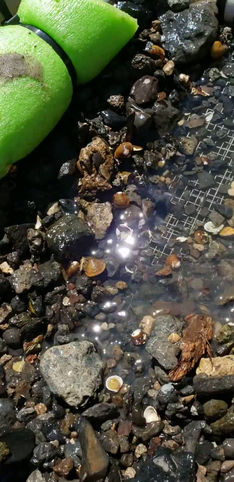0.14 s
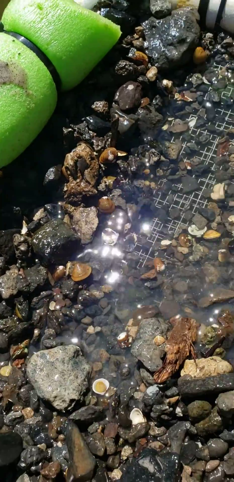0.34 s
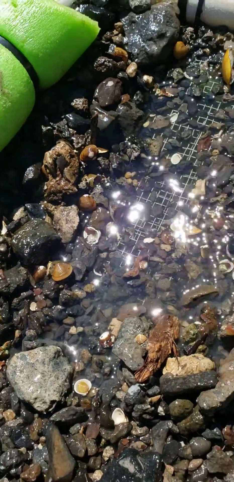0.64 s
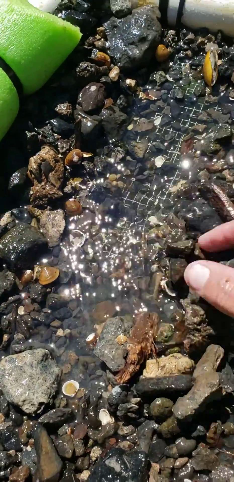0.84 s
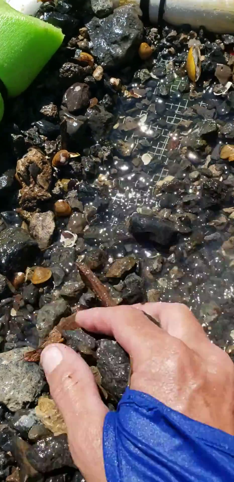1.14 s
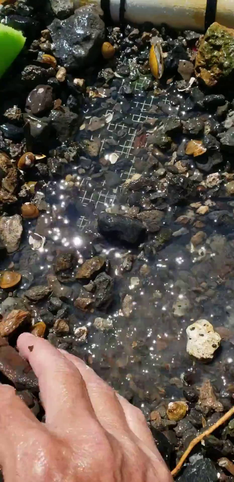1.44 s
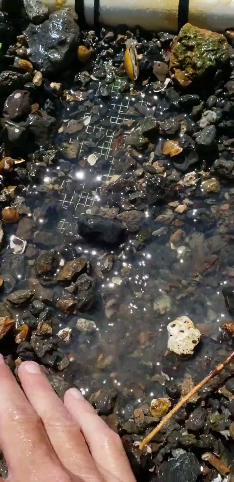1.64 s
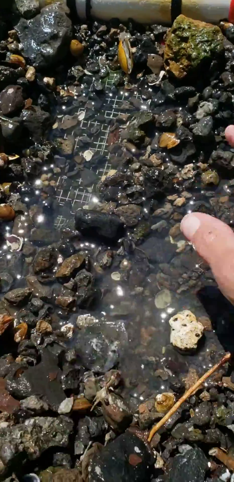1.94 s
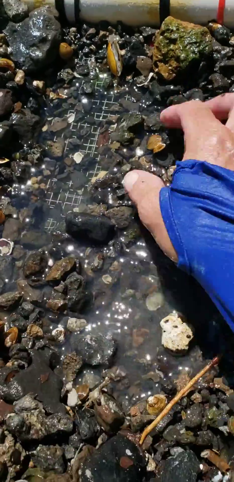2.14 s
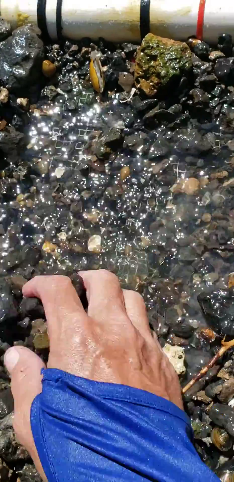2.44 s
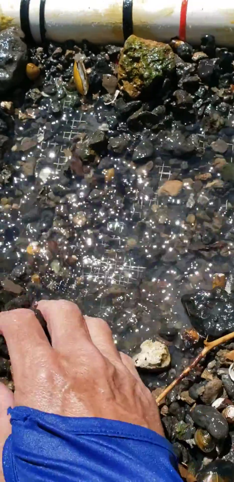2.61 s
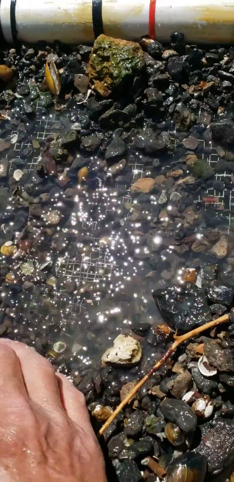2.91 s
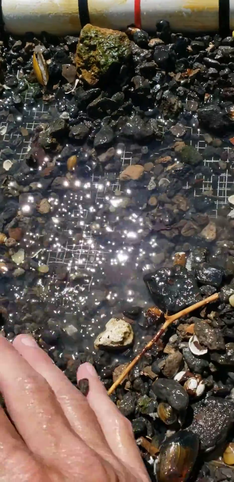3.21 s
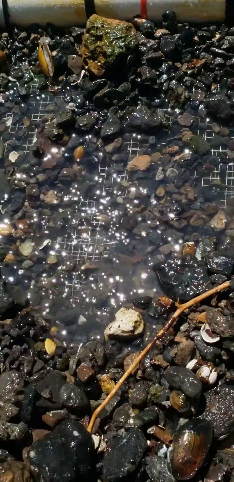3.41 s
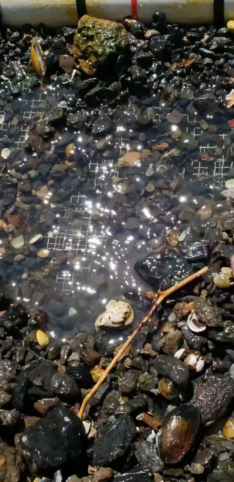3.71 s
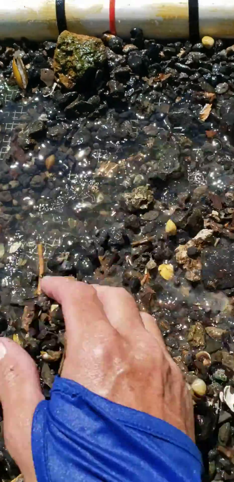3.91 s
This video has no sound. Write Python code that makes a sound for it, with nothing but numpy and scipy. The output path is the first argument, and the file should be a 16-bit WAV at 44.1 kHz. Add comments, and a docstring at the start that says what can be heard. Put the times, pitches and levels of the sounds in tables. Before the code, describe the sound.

Close up outdoors, wet gravel and shells lie on a floating sifter screen. Several crisp stone clicks and tiny slips open the scene, thinning to near quiet by 0.2 s. A soft frame bump comes near 0.35 s, with a faint rising slurp around 0.5 s, as a hand's rake builds into a dense, bright crunch with grating pebbles, strongest around 0.8-1.0 s. It fades gradually through 1.6 s with stray clicks. Light ticks and slips gather from 1.8 s; a short, sharp rake hits at about 2.2 s with a watery gurgle, then decays through pebble slides and small bubbles near 2.7-2.95 s. From 3.0 to 3.5 s there is only light grit and small snaps. A forceful crunch with a low frame thump swells at 3.6-3.9 s, and another follows abruptly at 3.9 s, with gurgles to the end. Stones sit mostly left of centre over a very faint low drone.

```python
"""A few wet stones click and slip, then a hand rakes gravel and shell across a floating sifter screen.
Grit, pebbles and single stones are short damped rings; noise reflections scatter them over the bed.
Water is many tiny rising bubbles and larger gurgles; a short rising slurp and a faint, nearly level tone
are unsteady sines. Low rings make the frame rumble and the mesh scrape; stones slide and settle between
strokes. Filtered noise and a wavering hum make a faint low outdoor drone."""
import sys
import numpy as np
from scipy import signal
from scipy.fft import rfft, irfft, next_fast_len
from scipy.io import wavfile
from scipy.ndimage import uniform_filter1d, map_coordinates

SR = 44100
rng = np.random.default_rng(int(sys.argv[2]) if len(sys.argv) > 2 else 0)


def wrap_up_sound(samples):
    """Save the sound to the file named by the first command line argument, as 16-bit audio."""
    columns = np.atleast_2d(samples).T
    # keep every value between -1 and 1, then stretch to whole-number steps
    tamed = np.clip(columns, -1, 1)
    steps = np.round(tamed * 32767).astype(np.int16)
    wavfile.write(sys.argv[1], SR, steps)


N = 179221  # samples in the scene

# path of the moving stones: start_s [s], left_over_right_db [dB]
STONE_PATH = [(0.0, -0.5), (0.04, 3.5), (0.65, 3.5), (1.02, 0.5), (1.94, 2), (2.09, 6), (2.11, 7),
              (2.16, 6), (2.41, 2.0), (3.63, 4.5), (4.04, 1.5), (4.06, 5.5)]
# stones and shells that snap together: start_s [s], level_db [dB, first 2 ms before reflections],
# ring_hz [Hz, centre of the modes], left_over_right_db [dB]
STONE_CLICKS = [(.0103, -27.5, 14350, 0), (.0381, -30, 14060, 6), (.0433, -24, 10600, 4),
                (.2214, -47.5, 4040, 7), (.2968, -42, 6130, 5), (.3339, -35, 4570, 5),
                (.5737, -19, 13900, 8), (.6156, -28.5, 4296, 10.5), (.6775, -22, 12800, 8),
                (.6862, -32, 6880, 9.5), (.8492, -18, 3880, 3), (1.2301, -26.5, 13240, -7),
                (1.3217, -31.5, 10100, 0), (1.4452, -29, 11200, 3), (1.8374, -31, 12250, 0.5),
                (1.8422, -27, 5500, 5), (1.8485, -30, 13100, 3), (1.9229, -32, 9620, -2),
                (1.9737, -39, 4990, 8), (1.9996, -36.5, 14550, 4.5), (2.0171, -32, 13130, 2),
                (2.0331, -32, 13500, 7), (2.0407, -27.5, 11420, 1.5), (2.1174, -28, 10600, -6.5),
                (2.1963, -19, 15270, 11), (2.2293, -32, 14300, 7), (2.3088, -27.5, 3500, 6),
                (2.4832, -25, 10630, 2.5), (3.0637, -32.5, 12960, 1), (3.1408, -32.5, 6390, 6),
                (3.205, -27, 12180, 7), (3.2822, -29.5, 14530, 4), (3.345, -32, 14720, 5),
                (3.3972, -33, 14180, 3.5), (3.421, -33, 13200, 9), (3.4288, -30, 10640, 5),
                (3.5429, -40.5, 13340, 3), (3.6029, -30.5, 10350, 2), (3.6622, -23, 12150, 15),
                (3.8376, -26, 14800, 5)]
# air pockets that gurgle through the mesh: start_s [s], level_db [dB, before a common trim],
# pitch_hz [Hz, centre of the bubbles]
AIR_POCKETS = [(2.224, -18.5, 1462), (2.709, -24, 2218), (2.78, -28, 1330), (2.794, -31, 1138),
               (2.946, -34, 1330), (2.96, -35.5, 1170), (3.777, -23, 2476), (3.849, -25, 929),
               (3.983, -19.5, 1638), (4.013, -23, 1480)]
# tone colours of gravel, water, mesh, frame and outdoor air: freq_hz [Hz], response_db [dB]
GRAVEL_COLOUR = [(900, -42), (1500, -25.5), (2100, -11.5), (2700, -6.5), (3500, -2.5), (4700, 0),
                 (6500, -0.5), (7700, -2), (8500, -5), (10000, 0), (13000, 2), (16000, -1)]
WATER_COLOUR = [(400, -56), (800, -8.5), (1300, 3), (2200, -2.5), (3200, -4), (6000, -41)]
MESH_COLOUR = [(150, -13.5), (330, 1), (600, 1), (900, 0), (1600, -13)]
FRAME_COLOUR = [(70, -44), (140, -4), (200, 6.5), (300, -2.5), (600, -45)]
OUTDOOR_COLOUR = [(20, -31), (35, -6.5), (60, 3), (95, 3.5), (130, -6), (200, -4), (300, -24), (500, -18),
                  (800, -55), (1600, -18), (3000, -29.5)]
# decay of the reflections off the gravel bed, for stones and water: freq_hz [Hz], t60_s [s]
BED_DECAY = [(500, 0.093), (4000, 0.076), (14000, 0.034)]
# rakes of the hand: start_s [s], rise_s [s], hold_s [s], fade_db_per_s [dB/s, before SETTLING_SPEED],
# lift_s [s], grit_db [dB], pebbles_db [dB], large_stones_db [dB], water_db [dB, before a common trim]
RAKE_STROKES = [(.365, .52, .07, 30, 1.67, -25, -27, -24, -38),
                (1.72, .12, .1, 30.5, 2.04, -47.5, -49, -48, -68),
                (2.085, .115, .03, 85, 2.42, -31, -34, -38.5, -36),
                (2.27, .17, .06, 18, 2.96, -38, -38, -37, -53),
                (3.01, .06, .15, 45, 3.43, -43.5, -47.5, -53, -69),
                (3.575, .21, .1, 120, 3.9, -22.5, -27.5, -24.5, -41.5),
                (3.89, .04, .06, 110, 4.1, -24, -28.5, -29, -42)]
# small avalanches of loose stones: start_s [s], length_s [s], grit_db [dB], pebbles_db [dB]
STONE_SLIDES = [(.002, .012, -39, -41), (0.033, .05, -42, -45), (.1, .045, -50, -48), (.17, .015, -52, -51),
                (.275, .04, -56, -54), (.335, .035, -44, -46), (.41, .14, -45, -39),
                (0.767, .035, -31, -27.5), (.835, .025, -32, -28), (0.914, .025, -28, -32),
                (1.41, .03, -41.5, -46), (1.621, .045, -43.5, -51), (1.81, .055, -44, -46),
                (1.92, .03, -40.5, -51.5), (2.176, .044, -25, -32), (2.28, .04, -36, -40),
                (2.47, .02, -33, -39), (2.693, .03, -42, -43), (2.765, .033, -38, -40),
                (2.888, .025, -36, -40), (2.94, .03, -42, -46), (3.125, .03, -43, -44),
                (3.178, .025, -41, -45), (3.245, .025, -41, -49)]
# resting bed: grit_db, pebbles_db, large_stones_db, water_db [dB, water before a common trim]
BED_REST_DB = [-59, -63, -58, -69]
# the hand's weight on the screen: start_s [s], rise_s [s], hold_s [s], fade_db_per_s [dB/s], lift_s [s],
# frame_db [dB, before a small trim], mesh_db [dB]
HAND_PRESSES = [(0, 0.035, .12, 102.5, 0.56, -63, -59), (.31, 0.047, 0.0096, 120, .5, -53.5, -48.5),
                (.38, 0.13, 0.43, 25.5, 1.65, -61, -49.5), (1, 0.31, 0.2, 81.5, 2.1, -59, -65),
                (1.53, 0.033, .02, 90, 1.72, -56, -56), (1.81, 0.026, 0.013, 206, 1.97, -59, -67),
                (1.98, 0.025, 0.009, 201.5, 2.25, -59.5, -66.5), (2.085, .08, 0.071, 66, 2.45, -56, -43.5),
                (2.83, 0.044, 0.043, 92.5, 3.17, -62.5, -67), (3.25, .15, 0.26, 50, 3.7, -71.5, -67.5),
                (3.59, 0.064, 0.064, 150, 3.84, -46.5, -51), (3.58, 0.14, 0.2, 74.5, 4.03, -58, -51)]
# floating screen at rest: frame_db [dB, before a small trim], mesh_db [dB]
FLOAT_REST_DB = [-68, -74]
# a short rising slurp and a faint, nearly level tone: start_s [s], length_s [s], first_hz [Hz],
# last_hz [Hz], level_db [dB, before the swell], unsteadiness_hz [Hz]
FAINT_TONES = [(.47, 0.14, 1080, 2127, -51, 69.5), (3.269, 0.414, 575.6, 584, -68.5, 45)]
# fade speed, heavy stones stopping first: grit, pebbles, large_stones, water [factor]
SETTLING_SPEED = [.95, 1.1, 1.26, 1]

TOP_HZ = 16000  # band limit
STONE_T60_S = .011
PUSH_CURVE = 1.25  # exponent of the build-up
LIFT_DB_PER_S = 220.5  # extra fade once the hand lifts
SLIDE_LARGE_DB, SLIDE_WATER_DB = 2.5, -13  # larger stones and water against a slide's pebbles
SLIDE_RISE_SHARE = .5  # part of its length that a slide takes to gather
SLIDE_FADE_DB_PER_S = 470  # before SETTLING_SPEED
PRESS_WATER_DB = -4  # water forced through the screen, against the mesh scrape


def amp(db):
    """Decibels to gain."""
    return 10 ** (np.asarray(db) / 20)


def unit(x):
    """x at rms 1."""
    return x / np.sqrt(np.mean(x ** 2) + 1e-20)


def along(points, hz):
    """Read (Hz, value) points on a log frequency axis."""
    f, v = np.transpose(points)
    return np.interp(np.log(hz + 1), np.log(f + 1), v)


def curves(rows):
    """Draw one curve over the scene for each column after the time."""
    s, *columns = np.transpose(rows)
    return [np.interp(np.arange(N) / SR, s, column) for column in columns]


def filtered(x, response):
    """Apply a gain that depends on frequency, padded so the end does not wrap to the start."""
    m = next_fast_len(N + SR // 4)
    gain = response(np.fft.rfftfreq(m, 1 / SR))
    return irfft(rfft(x, m) * gain, m)[..., :N]


def coloured(x, spectrum):
    """Tint x with a (Hz, dB) response."""
    return filtered(x, lambda hz: amp(along(spectrum, hz)))


def wobble(rate):
    """A smooth random curve with rate knots a second."""
    knots = rng.standard_normal(int(N * rate / SR) + 4)
    return map_coordinates(knots, [np.arange(N) * rate / SR])


def panned(lr_db):
    """Left and right gains of constant power, lr_db apart."""
    g = amp(np.array([lr_db, -lr_db]).reshape(2, -1) / 2)
    return g / np.sqrt(np.mean(g ** 2, axis=0))


def add(out, s, sound):
    """Mix a stereo sound in at time s."""
    i = max(round(s * SR), 0)
    out[:, i:i + sound.shape[1]] += sound[:, :N - i]


def steady(x, size=2200):
    """Even the slow level to about rms 1, averaging over size samples; single grains still stand out."""
    power = uniform_filter1d(uniform_filter1d(np.mean(x ** 2, axis=0), size), size)
    return x / np.sqrt(np.abs(power) + 1e-12)


def grains(rate, lo_hz, hi_hz, life, spread_db, pan_db, lag, rise=0, size=128):
    """Stereo contacts at rate per second: damped rings of random pitch, decay (about life s), level and pan."""
    total = np.cumsum(rate) / SR
    u = rng.random((int(total[-1]), 6))
    start = np.searchsorted(total, u[:, 0] * total[-1])
    hz = lo_hz + (hi_hz - lo_hz) * u[:, 1:2]
    decay = life * 2 ** (2 * u[:, 2:3] - 1)
    gains = amp(-spread_db * np.log(u[:, 3] + 0.038)) * panned(pan_db * (2 * u[:, 4] - 1))
    samples = np.arange(size)
    ears = []
    for side, gain in zip((-1, 1), gains):
        # each contact reaches one ear first, by up to lag seconds
        delay = lag * (1 + side * (2 * u[:, 5:] - 1)) / 2
        t = np.maximum(samples / SR - delay, 0)
        tone = np.sin(2 * np.pi * hz * t * (1 + rise * t / decay))
        ring = gain[:, None] * np.exp(-t / decay) * tone
        ears.append(np.bincount((start[:, None] + samples).ravel(), ring.ravel(), N)[:N])
    return np.array(ears)


def scattered(x, wet_db, count=40):
    """Add short reflections off the gravel bed: decaying noise, drawn anew for each of count stretches."""
    out = x.copy()
    for part in np.array_split(np.arange(N), count):
        hz, t, z = signal.stft(rng.standard_normal((2, SR // 16)), SR, nperseg=64)
        decay = amp(-60 * t / along(BED_DECAY, hz)[:, None])
        tail = signal.istft(z * decay, SR, nperseg=64)[1]
        tail = tail / np.linalg.norm(tail[0])
        add(out, part[0] / SR, amp(wet_db) * signal.fftconvolve(x[:, part], tail, axes=1))
    return out


def outdoors(hum_hz=94, hum_db=-66, rumble_db=-59):
    """A low drone of mostly shared noise, with a wavering hum and its octave, leaning left."""
    air = rng.standard_normal(N) + 0.31 * rng.standard_normal((2, N))
    phase = 2 * np.pi * np.cumsum(hum_hz * (1 + .035 * wobble(12))) / SR
    tone = unit(np.sin(phase) + .4 * np.sin(2 * phase))
    hum = amp(hum_db + 1.5 * wobble(8)) * tone
    rumble = amp(rumble_db) * unit(coloured(air, OUTDOOR_COLOUR))
    return panned(8.0) * (rumble + hum)


def faint_tones():
    """A narrow, unsteady tone that swells and dies away, its pitch going from first_hz to last_hz."""
    out = np.zeros(N)
    for s, length, first_hz, last_hz, db, rough_hz in FAINT_TONES:
        progress = np.clip((np.arange(N) / SR - s) / length, 0, 1)
        hz = first_hz * (last_hz / first_hz) ** progress + rough_hz * wobble(250)
        tone = unit(np.sin(2 * np.pi * np.cumsum(hz) / SR))
        out += amp(db + 2.5 * wobble(90)) * np.sin(np.pi * progress) * tone
    return panned(5) * out


def screen(frame_db, mesh_db):
    """Stones bump over the mesh wires and shake the frame: two swarms of low damped rings."""
    bumps = grains(np.full(N, 350), 121, 454, life=0.0031, spread_db=7, pan_db=0.5, lag=0.00085, size=1200)
    scrapes = grains(np.full(N, 900), 230, 1342, life=0.0031, spread_db=0.5, pan_db=-1, lag=0.0005,
                     size=500)
    frame = amp(frame_db + 0.5) * steady(coloured(bumps, FRAME_COLOUR))
    mesh = amp(mesh_db) * steady(coloured(scrapes, MESH_COLOUR))
    return frame + mesh


def water(slosh_db):
    """Water churned through the stones: many small bubbles that rise in pitch, more when it is louder."""
    rate = 3000 * amp(.3 * (slosh_db - slosh_db.max()))
    bubbles = grains(rate, 708, 3020, life=0.0008, spread_db=3.5, pan_db=17.0, lag=0.00019, rise=0.024,
                     size=400)
    wet = coloured(scattered(bubbles, wet_db=-4), WATER_COLOUR)
    return amp(slosh_db - 2.5) * steady(wet)


def gurgles(t60=0.035, attack=0.0013, scatter=0.015, count=3):
    """A trapped air pocket breaks into count bubbles of like size, each weaker (times in s)."""
    out, t = np.zeros((2, N)), np.arange(SR // 12) / SR
    for s, db, hz in AIR_POCKETS:
        for k in range(count):
            pitch = hz * np.exp(rng.normal(0, 0.075))
            tone = np.sin(2 * np.pi * pitch * t * (1 + 0.59 * t))  # rises slightly
            bubble = tone * amp(-60 * t / t60) * (1 - np.exp(-t / attack))
            add(out, s + k * scatter * rng.random(), amp(db - 8.5 - 4.8 * k) * panned(8.8) * bubble)
    return out


def clicks(crack_db=-2, rebound_db=-5, size=88):
    """A stone strikes, rings in four modes with a noise crack, and chatters once against its neighbour."""
    out, t = np.zeros((2, N)), np.arange(SR // 50) / SR
    for s, db, hz, lr_db in STONE_CLICKS:
        modes = np.minimum(hz * np.exp(rng.normal(0, .15, (4, 1, 1))), TOP_HZ - 500)
        ring = np.sin(2 * np.pi * (modes * t + rng.random((4, 2, 1)))).mean(axis=0)
        crack = amp(crack_db) * rng.standard_normal((2, len(t)))
        hit = (ring + crack) * amp(-60 * t / STONE_T60_S)
        hit = hit + amp(rebound_db) * np.roll(hit, rng.integers(30, 110), axis=1)
        # a small stone radiates little far below its ring
        hit = signal.lfilter(*signal.butter(3, [.68 * hz, 15900], "bandpass", fs=SR), hit)
        hit = hit / hit[:, :size].std(axis=1, keepdims=True)
        add(out, s, amp(db) * panned(lr_db) * hit)
    return scattered(out, wet_db=-8)


def crunch(level_db, band, contacts, crowding, clump_db, life, spread_db):
    """Stones slip in small avalanches; a harder stroke sets more of them going."""
    rate = contacts * amp(crowding * (level_db - level_db.max()))
    hits = grains(rate, 1610, TOP_HZ, life, spread_db, pan_db=13, lag=0.0002865)
    hits = scattered(hits * amp(clump_db * wobble(110)), wet_db=-1)
    hits = filtered(hits, lambda hz: amp(along(GRAVEL_COLOUR, hz)) * band(hz))
    return amp(level_db) * steady(hits, size=1300)


def gravel(grit_db, pebble_db, large_db):
    """Fine grit crackles on top; pebbles grate lower, and lowest where fingers dig among larger stones."""
    fine = lambda hz: 1 / (1 + (7500 / (hz + 1)) ** 8)
    grit = crunch(grit_db, lambda hz: np.sqrt(fine(hz)), contacts=4200, crowding=.35, clump_db=1.5,
                  life=0.00016, spread_db=-0.5)
    pebbles = crunch(pebble_db, lambda hz: np.sqrt(1 - fine(hz)), contacts=4200, crowding=.25, clump_db=2,
                     life=0.00022, spread_db=1.5)
    # the pebbles' low part gets the larger stones' own level
    large = filtered(pebbles, lambda hz: 1 / (1 + (hz / 4000) ** 8))
    return grit + pebbles - large + amp(large_db - pebble_db) * large


def swell(t, start, rise, hold, fade, lift):
    """Gain of one movement: it builds, holds, fades, and drops fast once the hand lifts."""
    attack = np.clip((t - start) / rise, 0, 1) ** PUSH_CURVE
    fade_db = fade * np.maximum(t - start - rise - hold, 0)
    lift_db = LIFT_DB_PER_S * np.maximum(t - lift, 0)
    return attack * amp(-fade_db - lift_db)


def levels(movements, rest_db, settling):
    """Level in dB of each layer: the powers of all movements add to that of the resting state."""
    t = np.arange(0, N / SR, .001)
    power = amp(rest_db)[:, None] ** 2
    for start, rise, hold, fade, lift, *dbs in movements:
        gain = swell(t, start, rise, hold, fade * np.array(settling)[:, None], lift)
        power = power + (amp(dbs)[:, None] * gain) ** 2
    return curves(np.column_stack([t, *(10 * np.log10(power))]))


def stirring():
    """Levels of grit, pebbles, larger stones and water as strokes and slides move the bed."""
    slides = []
    for s, length, grit, pebbles in STONE_SLIDES:
        rise = SLIDE_RISE_SHARE * length
        hold = (1 - SLIDE_RISE_SHARE) * length
        # lift at the scene's end: no hand is involved
        slides.append((s, rise, hold, SLIDE_FADE_DB_PER_S, N / SR,
                       grit, pebbles, pebbles + SLIDE_LARGE_DB, pebbles + SLIDE_WATER_DB))
    return levels(list(RAKE_STROKES) + slides, BED_REST_DB, SETTLING_SPEED)


def scene():
    """Mix all layers; stones, water and screen follow the hand from side to side."""
    place_db, = curves(STONE_PATH)
    grit_db, pebble_db, large_db, churn_db = stirring()
    frame_db, mesh_db = levels(HAND_PRESSES, FLOAT_REST_DB, settling=[1, 1])
    # water stirred by the stones and water pressed through the screen add in power
    slosh_db = 20 * np.log10(np.hypot(amp(churn_db), amp(mesh_db + PRESS_WATER_DB)))
    stones = panned(place_db) * gravel(grit_db, pebble_db, large_db)
    below = panned(place_db + 2.5) * (water(slosh_db) + screen(frame_db, mesh_db))
    return stones + below + clicks() + gurgles() + faint_tones() + outdoors()


def record(dry):
    """Keep nothing at or above the band limit."""
    return filtered(dry, lambda hz: hz < TOP_HZ)


dry = scene()
out = record(dry)
wrap_up_sound(out)
```